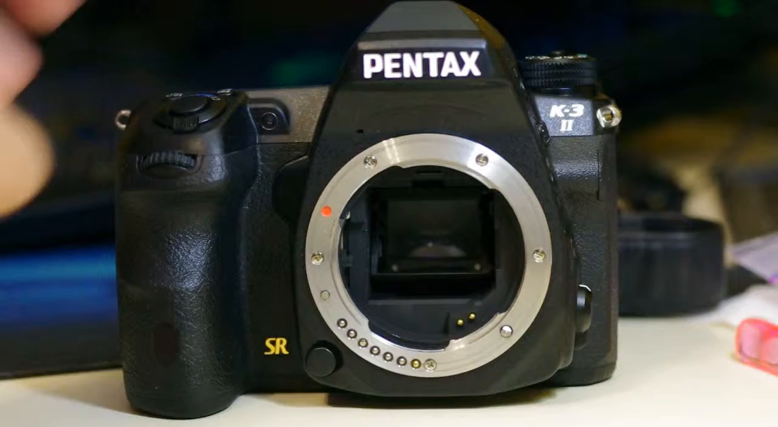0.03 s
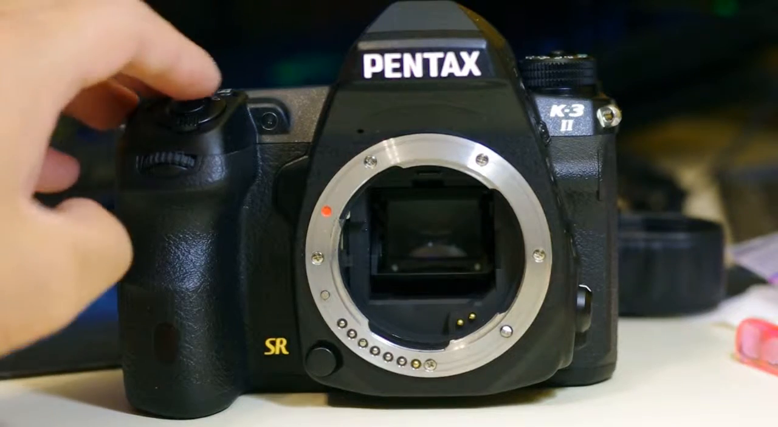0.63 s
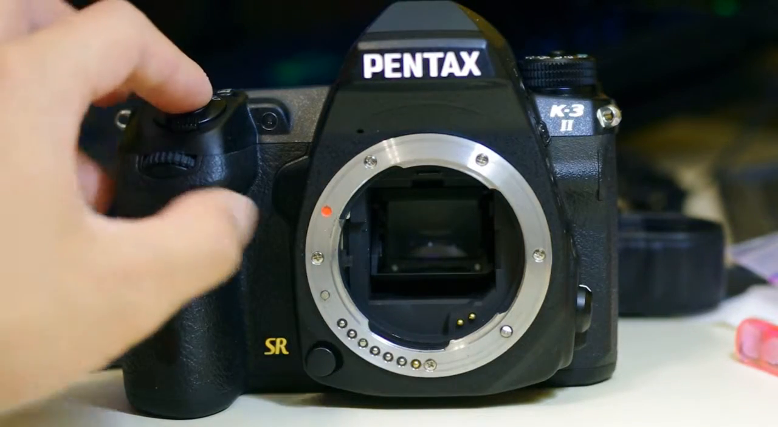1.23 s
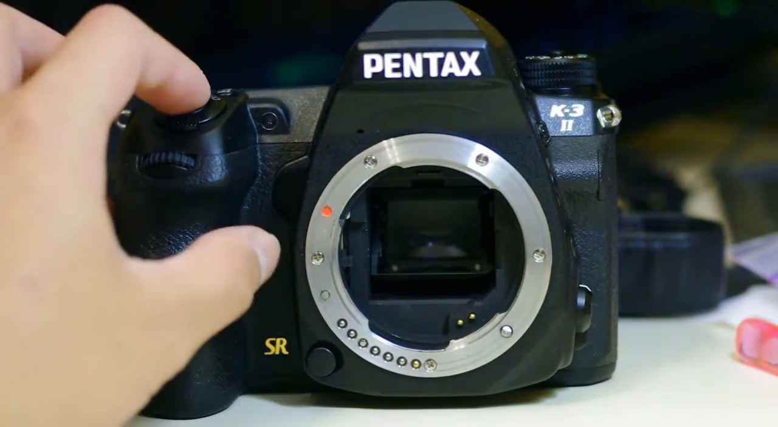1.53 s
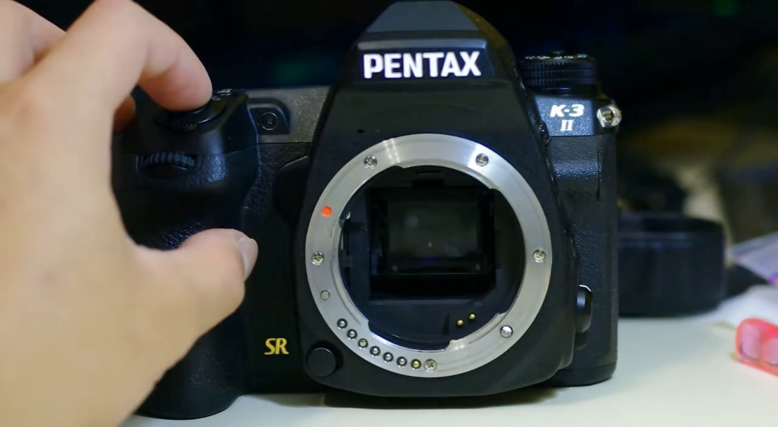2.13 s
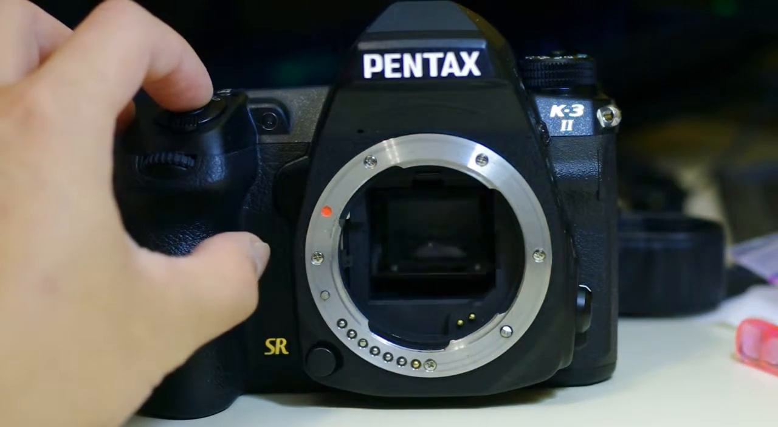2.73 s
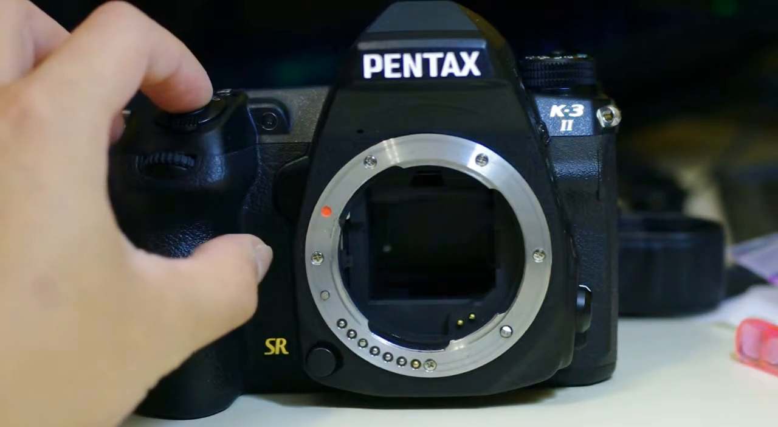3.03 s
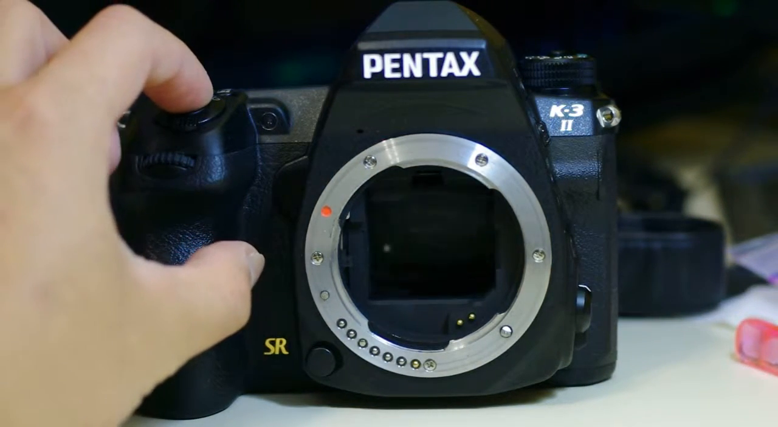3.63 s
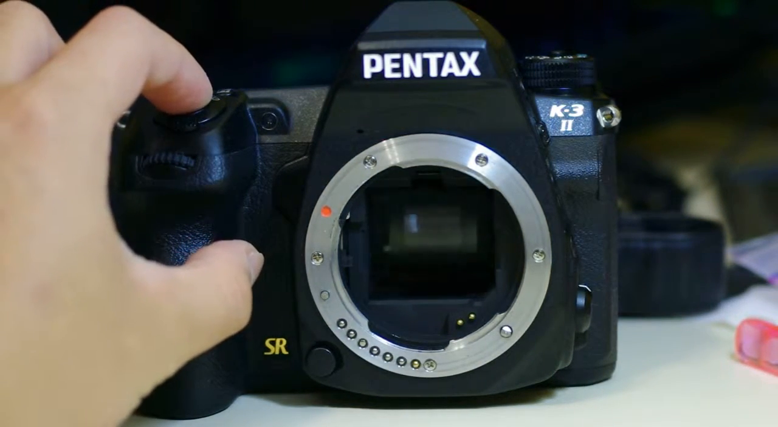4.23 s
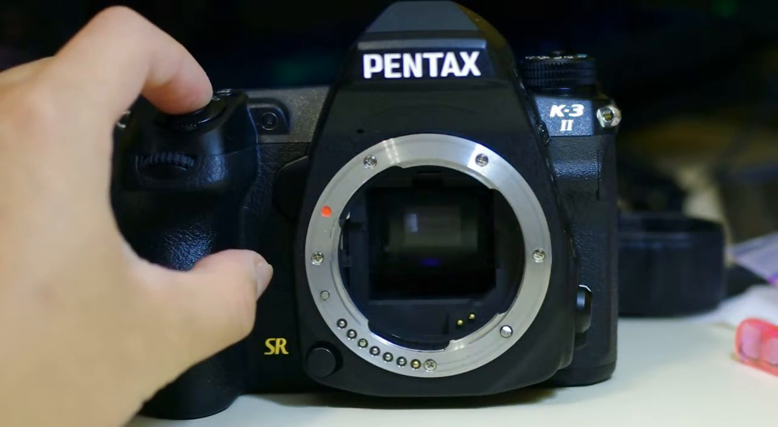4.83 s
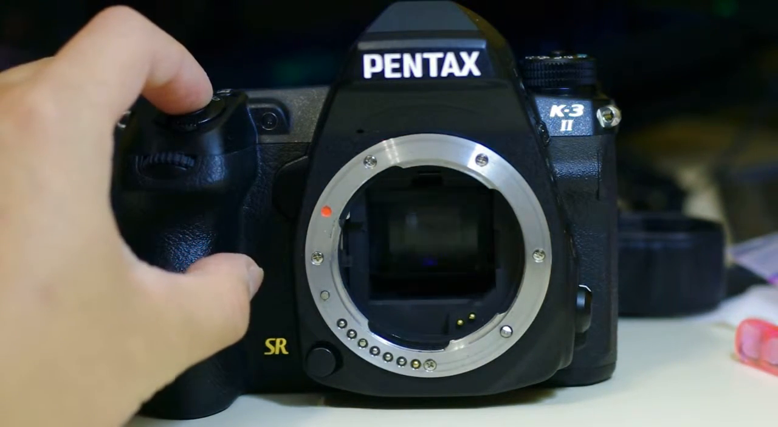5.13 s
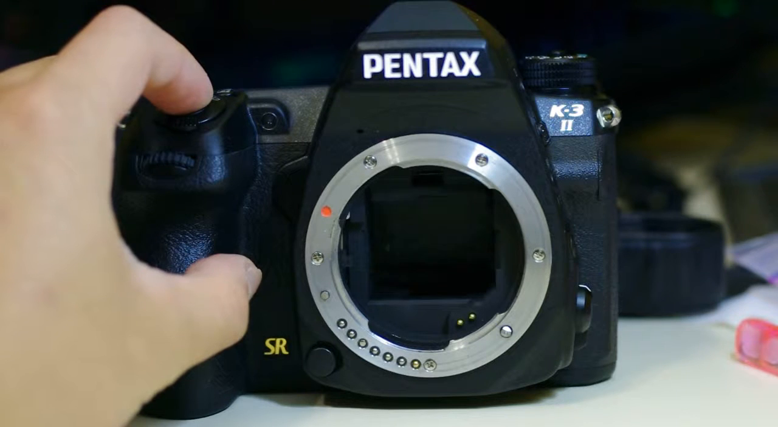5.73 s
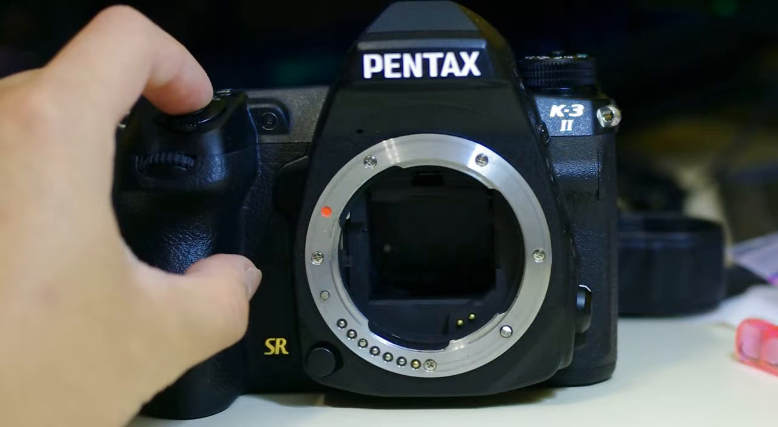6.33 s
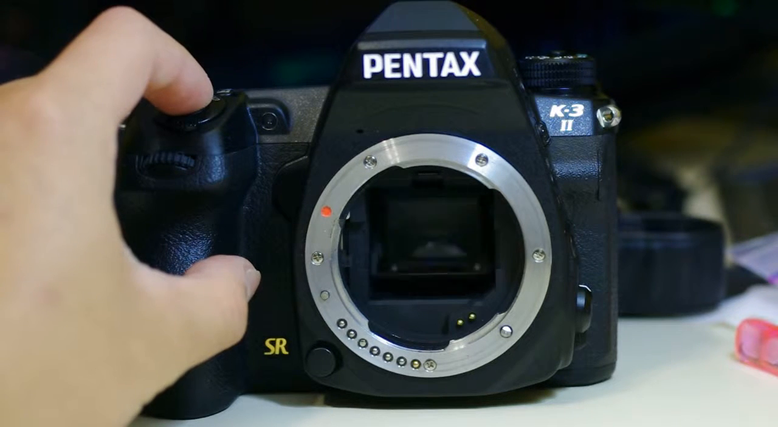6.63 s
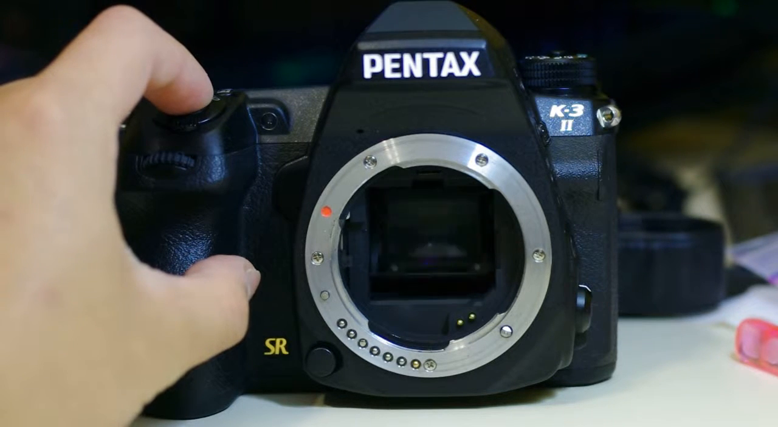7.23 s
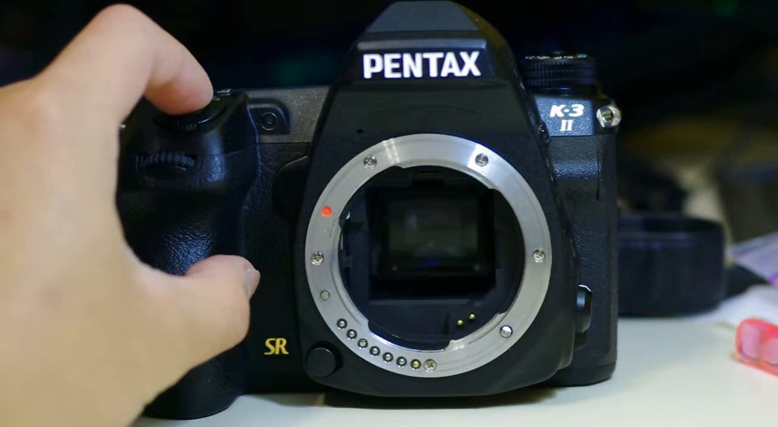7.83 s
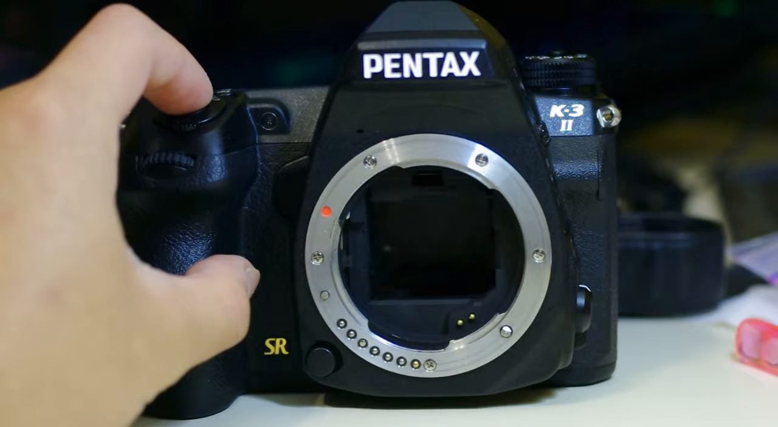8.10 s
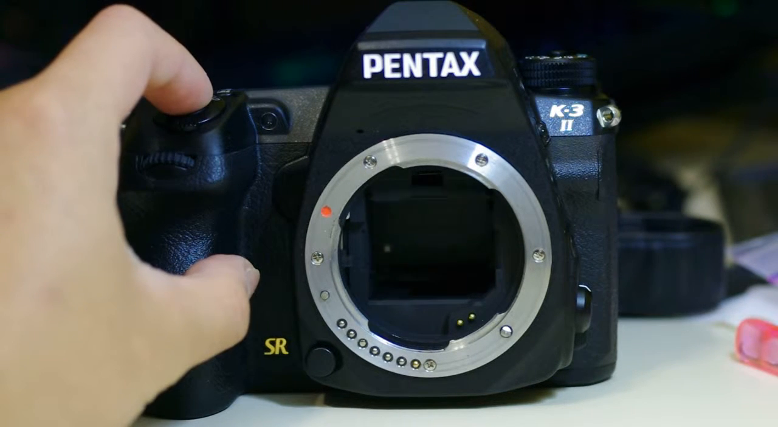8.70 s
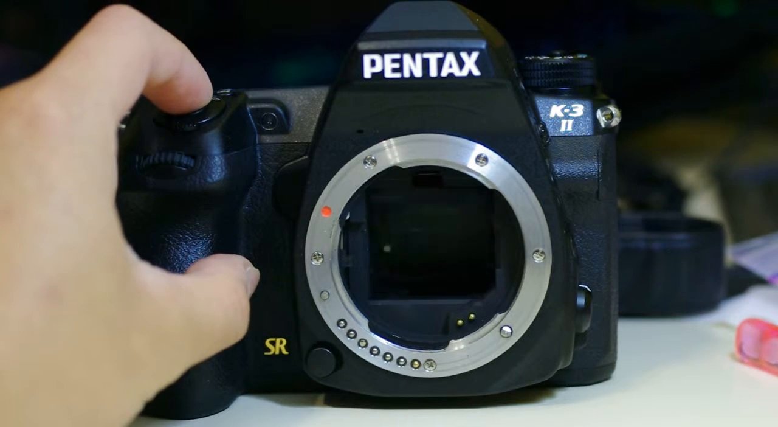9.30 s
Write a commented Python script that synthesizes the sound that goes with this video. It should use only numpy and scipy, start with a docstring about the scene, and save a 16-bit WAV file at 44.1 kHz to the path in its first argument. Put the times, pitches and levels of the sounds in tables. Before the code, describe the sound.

A low, dull room rush comes first, with a few faint taps as fingers settle on a camera grip. After about two seconds the reflex camera starts firing continuously, between eight and nine shots a second. Each shot combines a mirror slap, a bright, dry shutter snap and a brief whir of winding gears. The loud, even clatter lasts about seven seconds, heard close up on a desk in a small room.

```python
"""A reflex camera with no lens fires a burst of 8.5 frames a second, close by on a desk.
In each frame a magnet whistles, the mirror slaps up, two shutter curtains snap across,
the mirror drops and a geared motor winds the springs again. Every blow rings the camera body
and a small room. Before the burst there is only room noise and a hand on the grip."""
import sys
import numpy as np
from scipy import signal
from scipy.fft import rfft, irfft
from scipy.io import wavfile
from scipy.ndimage import uniform_filter1d, minimum_filter1d

SR = 44100
rng = np.random.default_rng(int(sys.argv[2]) if len(sys.argv) > 2 else 0)


def wav_out(sig):
    """Save sig, one row per channel (or a flat mono array), as 16-bit PCM at SR to the path in sys.argv[1]."""
    wavfile.write(sys.argv[1], SR, np.round(np.clip(np.atleast_2d(sig).T, -1, 1) * 32767).astype(np.int16))


N = 417186
TAPS = 8192  # samples in one short sound
AGE = np.arange(TAPS) / SR  # seconds since it began
FREQS = np.maximum(np.fft.rfftfreq(TAPS, 1 / SR), 1)


# Tone of each curtain and of the blades: f/Hz, level/dB
FIRST_TONE = [(60, -55), (500, -21), (1300, -17.5), (2100, -19), (3600, -5), (4400, -8.5), (5400, -9.5),
              (6300, -20), (7600, -1.5), (8500, -6), (9100, 5), (10000, -5), (11300, -9), (13700, -2),
              (16000, -29)]
SECOND_TONE = [(50, -47.5), (180, -50.5), (400, -19), (850, -11), (1400, -18.5), (1950, -14.5),
               (3000, -16.5), (4200, -13.5), (6400, -15), (9100, -9.5), (10200, -7.5), (11200, 1.5),
               (12300, -10.5), (14000, -12.5), (16000, -17)]
BLADE_TONE = [(200, -36.5), (1500, -33), (4500, -10), (6300, -12.5), (9200, -7), (10200, -8), (11200, 1),
              (12500, -5.5), (14200, -8), (16000, -19)]
# Tiny hits within each curtain's landing: t/s, level/dB
FIRST_HITS = [(.0001, 6), (.0006, -2.5), (.0012, -3.5), (.008, -12), (0.0114, -22.5)]
SECOND_HITS = [(.0001, -2.5), (.0005, 1), (.0009, 2.5), (.002, -20), (.0095, -13), (0.0134, -17.5)]

def shutter():
    """Two curtains land with a dry snap; the first bounces off its brake and sets the blades ringing."""
    opens, closes = at_opening(db=-22, follow=.95), at_closing(db=-21.5, follow=2.2)
    first = blows(opens, FIRST_HITS, chatter_db=.5, chatter_t60=.0016,
                  ring_db=-13, ring_t60=.0085, alike=.79, scatter_s=.00003, scatter_db=2.1)
    second = blows(closes, SECOND_HITS, chatter_db=-2.5, chatter_t60=.0069,
                   ring_db=-15.5, ring_t60=.032, alike=1, scatter_s=.00003, scatter_db=.65)
    bounce = blows(opens, [(.0037, .5)], chatter_db=-5, chatter_t60=.0023,
                   ring_db=-30, ring_t60=.035, alike=.38, scatter_s=.0001, scatter_db=3.5)
    shimmer = blows(opens, [(.005, -1)], chatter_db=-12, chatter_t60=.01,
                    ring_db=29, ring_t60=.19, alike=.5)
    return colour(first, FIRST_TONE) + colour(second, SECOND_TONE) + colour(bounce + shimmer, BLADE_TONE)


# Tone of the lever, the rising mirror and the falling mirror: f/Hz, level/dB
LEVER_TONE = [(300, -62), (1500, -3), (2600, 4), (5500, -26), (9000, -1), (11500, 0), (14000, -1),
              (16000, -8)]
RISE_TONE = [(60, -54.5), (150, -28.5), (400, -14), (800, -14.5), (1130, -2), (1500, -8.5), (1950, -5.5),
             (2700, -2.5), (3500, -9.5), (6000, -13), (9000, -9.5), (12000, -6), (16000, -20.5)]
FALL_TONE = [(60, -37.5), (150, -22), (240, -9.5), (400, -14), (720, -10), (920, 7), (1050, -3.5),
             (1500, -3.5), (2000, -3), (2700, -1.5), (4000, -5), (6500, -8.5), (11500, -5), (16000, -9.5)]
# Tiny hits as the mirror rises and falls: t/s, level/dB
RISE_HITS = [(-.0005, -4.5), (.0007, -4.5), (.0018, -1), (.003, -7.5), (.0054, -0.5), (.0082, -3.5),
             (0.0101, -5), (0.0127, -4), (.0145, -1.5), (.018, -7)]
FALL_HITS = [(.0025, 3.5), (0.0095, -14), (.019, -3.5), (0.0221, 4.5), (0.0242, 1), (.0285, -0.5),
             (.031, 5)]

def mirror(lead_s=.0139):
    """A lever ticks, the mirror slaps up and bounces, then gears bring it down more softly."""
    rises, falls = at_opening(db=-28, follow=.8, delay_s=-lead_s), at_closing(db=-37)
    lever = blows(rises, [(-.0011, 1)], chatter_db=14, chatter_t60=.0055,
                  ring_db=5, ring_t60=.056, alike=.89, scatter_s=.0002)
    up = blows(rises, RISE_HITS, chatter_db=3, chatter_t60=.013,
               ring_db=-5, ring_t60=.013, alike=.99, scatter_s=.00006)
    down = blows(falls, FALL_HITS, chatter_db=3.5, chatter_t60=.021,
                 ring_db=-1.5, ring_t60=.054, alike=.77, scatter_s=.00012)
    return colour(lever, LEVER_TONE) + colour(up, RISE_TONE) + colour(down, FALL_TONE)


# Tone of a spring catch: f/Hz, level/dB
CATCH_TONE = [(60, -37), (150, -26), (280, -13), (420, -10.5), (800, -11.5), (1900, -4.5), (2900, -6),
              (3800, -1), (4600, -10), (6000, -9.5), (8000, -3), (9600, 4), (10600, -1.5), (12200, 5),
              (16000, -12)]
# Tiny hits within its click: t/s, level/dB
CATCH_HITS = [(0, -7), (.001, -1.5), (.0026, 0)]

def catches(after_s=.039, gap_s=.0089):
    """The two wound springs click into their catches, one just after the other."""
    springs = np.r_[at_closing(db=-29, delay_s=after_s), at_closing(db=-28.5, delay_s=after_s + gap_s)]
    clicks = blows(springs, CATCH_HITS, chatter_db=4, chatter_t60=.0088,
                   ring_db=-.5, ring_t60=.082, alike=.7, scatter_s=.0004, scatter_db=1.26)
    return colour(clicks, CATCH_TONE)


# How hard the motor works, timed from the second curtain: t/s, level/dB
MOTOR_LOAD = [(-.007, 2), (-.005, -4.5), (.006, -10.5), (0.02, 1.5), (0.035, -4), (0.048, 2), (0.055, 0),
              (.066, -0.5), (0.079, -2), (.09, -22)]
# Tone of the gears: f/Hz, level/dB
GEAR_TONE = [(40, -43), (100, -23), (150, -18), (280, -10.5), (450, -5.5), (800, -4.5), (2000, -4.5),
             (4500, -1), (6500, -2.5), (9500, -1), (12200, 2.5), (14500, -6.5), (16000, -19)]

def gears(tooth_hz=900, teeth_db=-4, alike=.79):
    """The motor grinds through the same gear teeth after every frame, so each grind is much alike."""
    load_s, load_db = np.transpose(MOTOR_LOAD)
    since_close = AGE + load_s[0]
    effort = amp(np.interp(since_close, load_s, load_db)) * (since_close < load_s[-1])
    track, wear = np.zeros(N), rng.standard_normal(TAPS)
    for s, db in at_closing(db=-38, delay_s=load_s[0]):
        hz = tooth_hz * (1 + .0059 * rng.standard_normal())
        rubbing = np.exp(amp(teeth_db) * np.cos(2 * np.pi * hz * AGE))  # peaks once a tooth
        grind = np.sqrt(alike) * wear + np.sqrt(1 - alike) * rng.standard_normal(TAPS)
        add(track, s, amp(db) * effort * rubbing * grind)
    return colour(track, GEAR_TONE)


def magnet(hz=10030, lead_s=.03, length_s=.0135, edge_s=.0015):
    """The release magnet whistles briefly just before the mirror lets go."""
    track = np.zeros(N)
    gate = np.clip(np.minimum(AGE, length_s - AGE) / edge_s, 0, 1)
    for s, db in at_opening(db=-41, follow=0, delay_s=-lead_s):
        add(track, s, amp(db) * np.sqrt(2) * gate * np.sin(2 * np.pi * hz * AGE))
    return track


# Tone of the hollow knock: f/Hz, level/dB
KNOCK_TONE = [(100, -41), (330, -10.5), (430, 3.5), (540, -7.5), (1000, -39), (4000, -62)]

def knock():
    """The camera body gives a hollow knock as the springs are pulled fully tight."""
    knocks = blows(at_closing(db=-46, delay_s=.043), [(.001, 0)], chatter_db=-17, chatter_t60=.016,
                   ring_db=-.5, ring_t60=.095, alike=.5, scatter_s=.00052)
    return colour(knocks, KNOCK_TONE)


def motor(start_hz=215, rise_hz_per_s=2200, length_s=.045):
    """The motor hums, rising in pitch as it winds the springs."""
    track = np.zeros(N)
    swell = np.sin(np.pi * np.minimum(AGE / length_s, 1))
    for s, db in at_closing(db=-57, delay_s=.028):
        hz = (start_hz + rise_hz_per_s * AGE) * (1 + .02 * rng.standard_normal())
        add(track, s, amp(db) * np.sqrt(2) * swell * np.sin(2 * np.pi * np.cumsum(hz) / SR))
    return track


# One row a frame: first curtain lands t/s, wait for the second t/s, extra force level/dB
BURST = [(2.3146, 0.0574, 1.15), (2.4656, 0.0225, -0.1), (2.5818, 0.022, 0.3), (2.6985, 0.0217, -0.7),
         (2.8159, 0.023, 0.4), (2.9351, 0.022, -0.5), (3.0586, 0.024, -0.65), (3.177, 0.0215, -1),
         (3.294, 0.021, -0.15), (3.4116, 0.0224, 0.2), (3.528, 0.0227, 0.1), (3.647, 0.021, 0.3),
         (3.7643, 0.023, 0.3), (3.8824, 0.023, 0), (3.9996, 0.0218, 0.5), (4.1169, 0.022, 0.7),
         (4.2347, 0.022, 0.1), (4.3553, 0.0209, -1.5), (4.472, 0.022, -2.0), (4.59, 0.022, -0.8),
         (4.71, 0.0217, -0.3), (4.828, 0.021, -1), (4.9457, 0.023, 0.3), (5.0659, 0.021, -0.9),
         (5.1811, 0.024, -0.25), (5.3, 0.0218, -1), (5.418, 0.021, 0.0), (5.535, 0.0228, 0.5),
         (5.653, 0.023, 0), (5.7706, 0.022, 0.4), (5.887, 0.023, -0.2), (6.006, 0.022, 0.0),
         (6.1231, 0.022, -0.2), (6.2408, 0.023, 0.8), (6.359, 0.022, 0.35), (6.4809, 0.022, -0.4),
         (6.599, 0.023, -0.1), (6.7167, 0.0219, -0.1), (6.833, 0.022, -1), (6.95, 0.023, 1.1),
         (7.07, 0.0213, 0.1), (7.1899, 0.021, 0.2), (7.3054, 0.024, -0.2), (7.4246, 0.022, -0.25),
         (7.543, 0.022, 0.5), (7.6604, 0.024, 0.7), (7.779, 0.023, 0.5), (7.8971, 0.021, -0.5),
         (8.0145, 0.024, 0.4), (8.1336, 0.022, -0.15), (8.2494, 0.022, 0.4), (8.3675, 0.023, -0.5),
         (8.4856, 0.023, 0.3), (8.605, 0.022, 0.0), (8.7226, 0.0235, 0), (8.8418, 0.0216, -0.1),
         (8.9592, 0.0214, 0), (9.077, 0.024, 0.7), (9.1959, 0.021, 0.5), (9.314, 0.022, 0.5),
         (9.431, 0.022, 0.2)]

def at_opening(db, follow, delay_s=0):
    """Rows of t/s, level/dB timed from each first curtain; follow scales the frame's extra force."""
    s, _, force_db = np.transpose(BURST)
    return np.c_[s + delay_s, db + follow * force_db]


def at_closing(db, follow=2.3, delay_s=0):
    """The same rows, timed from each second curtain."""
    _, wait_s, _ = np.transpose(BURST)
    return at_opening(db, follow, wait_s + delay_s)


# Pitches at which body, desk and blades ring: f/Hz, width/Hz, level/dB (below zero is a dip)
RESONANCES = [(148.8, 22.5, 13.5), (234, 24, 8.5), (289.6, 16.6, 10.5), (403.3, 38.6, 12), (500, 35, 5),
              (630, 220, 4.5), (905, 56, 5), (1105.5, 21.6, 8), (1220, 94, 4.5), (1366, 77, 4.5),
              (1856, 343, 5.5), (2283, 24, -3.5), (2560, 99, 2.5), (2905, 105, 3), (2980, 83, 4.5),
              (2964, 37, -15), (7800, 21, -0.5), (12100, 29, 2)]

def body(x):
    """The camera body boosts its own pitches, which ring on between the blows."""
    lift_db = sum(db / (1 + (2 * (FREQS - hz) / width) ** 2) for hz, width, db in RESONANCES)
    return through(x, ringing(lift_db - .45))


# Taps as the hand settles and presses the button: t/s, level/dB
FINGER_TAPS = [(.702, -56), (.866, -52), (.903, -51), (1.354, -50), (1.858, -46), (1.868, -56),
               (2.202, -54), (2.275, -50)]
# Tone of the grip: f/Hz, level/dB
GRIP_TONE = [(100, -5), (400, -2), (750, 7), (1500, -23), (3000, -19), (8000, -39), (16000, -36)]

def hand():
    """Fingers make dull little taps on the grip."""
    taps = blows(FINGER_TAPS, [(.0021, 0)], chatter_db=-5, chatter_t60=.028,
                 ring_db=-4, ring_t60=.1, alike=.17)
    return colour(taps, GRIP_TONE)


def room_echo(x, split_hz=3000, low_t60=.46, high_t60=.092, treble_db=-2, build_s=.0036, echo_db=-11.5):
    """The desk and near walls add a short wash of echoes whose treble dies first."""
    noise = rng.standard_normal(TAPS)
    low = signal.sosfilt(signal.butter(2, split_hz, fs=SR, output="sos"), noise)
    high = signal.sosfilt(signal.butter(2, split_hz, "high", fs=SR, output="sos"), noise)
    tail = low * fade(low_t60) - amp(treble_db) * high * fade(high_t60)
    build_up = 1 - np.exp(-(AGE / build_s) ** 2)
    return x + amp(echo_db) * through(x, tail * build_up)


# Tone of the room's rush, and its one faint whine: f/Hz, level/dB
RUSH_TONE = [(30, -47), (75, -23.5), (160, -11.5), (340, -4), (480, -6.5), (600, -2.5), (800, -5.5),
             (1000, -7.5), (1700, -9.5), (2800, -14), (4500, -20.5), (8000, -24.5), (12000, -26.5),
             (15500, -30)]
ROOM_WHINE = [(856, -66)]

def room_noise(rush_db=-53.5, whine_width_hz=8):
    """The room has a steady, dull rush with a little hiss and a faint, wavering whine."""
    rush = amp(rush_db) * colour(rng.standard_normal(N), RUSH_TONE)
    decay = np.exp(-np.pi * whine_width_hz * AGE)
    ring = sum(amp(db) * unit(decay * np.sin(2 * np.pi * hz * AGE)) for hz, db in ROOM_WHINE)
    return rush + through(rng.standard_normal(N), ring)


def blows(events, hits, chatter_db, chatter_t60, ring_db, ring_t60, alike, scatter_s=0, scatter_db=.34):
    """Each hit clicks, chatters and rings; alike (0 to 1) is the share of chatter that repeats."""
    track = np.zeros(N)
    chatter, ring = amp(chatter_db) * fade(chatter_t60), amp(ring_db) * fade(ring_t60)
    energy = 1 + np.sum(chatter ** 2 + ring ** 2)
    size = np.sqrt(.004 * SR / energy)  # a hit's level counts its energy as spread over 4 ms
    click = AGE == 0
    for delay, hit_db in hits:
        repeated = click + np.sqrt(alike) * chatter * rng.standard_normal(TAPS)
        loose = np.sqrt((1 - alike) * chatter ** 2 + ring ** 2) * rng.standard_normal((len(events), TAPS))
        chance = rng.standard_normal((len(events), 2))
        for (s, db), sound, (late, harder) in zip(events, repeated + loose, chance):
            add(track, s + delay + scatter_s * late, size * amp(db + hit_db + scatter_db * harder) * sound)
    return track


def colour(x, points):
    """Shape a sound's tone with rows of f/Hz, level/dB; white noise keeps its power."""
    hz, db = np.transpose(points)
    gain_db = np.interp(np.log(FREQS), np.log(hz), db)
    return through(x, unit(ringing(gain_db)))


def ringing(gain_db):
    """A filter with these gains that starts sharply, then rings (minimum phase)."""
    cepstrum = irfft(np.log(amp(gain_db)))
    cepstrum[1:TAPS // 2] *= 2
    cepstrum[TAPS // 2 + 1:] = 0
    return irfft(np.exp(rfft(cepstrum)))


def through(x, response):
    """Filter a sound, given the filter's response to one click."""
    return signal.fftconvolve(x, response)[:N]


def fade(t60):
    """A fade with energy 1 that falls 60 dB in t60 seconds."""
    return unit(np.exp(-np.log(1000) * AGE / t60))


def amp(db):
    """Turn decibels into a gain."""
    return 10 ** (np.asarray(db) / 20)


def unit(x):
    """Scale a sound to an energy of 1."""
    return x / np.sqrt(np.sum(x ** 2))


def add(track, s, sound):
    """Mix a sound in at s seconds."""
    start = int(np.clip(round(s * SR), 0, N))
    track[start:start + len(sound)] += sound[:N - start]


def limiter(x, ceiling_db=-8, knee=4):
    """Turn the level down for about a millisecond round each peak that nears the ceiling."""
    gain = (1 + (np.abs(x) / amp(ceiling_db)) ** knee) ** (-1 / knee)
    return x * uniform_filter1d(minimum_filter1d(gain, size=25), size=25)


def scene():
    """The moving parts sound through the camera body into the room."""
    camera = body(magnet() + mirror() + shutter() + gears() + catches() + motor() + knock())
    return (room_echo(camera + hand()) + room_noise())[None]


def record(dry, start_s=.104, low_cut_hz=85, top_hz=15750):
    """Start after a short silence, hold down the hardest clicks, thin the bass and cut the very top."""
    held = limiter(dry) * (np.arange(N) / SR > start_s)
    thin = signal.sosfilt(signal.butter(2, low_cut_hz, "high", fs=SR, output="sos"), held)
    return signal.sosfilt(signal.ellip(10, .2, 75, top_hz, fs=SR, output="sos"), thin)


dry = scene()
out = record(dry)
wav_out(out)
```